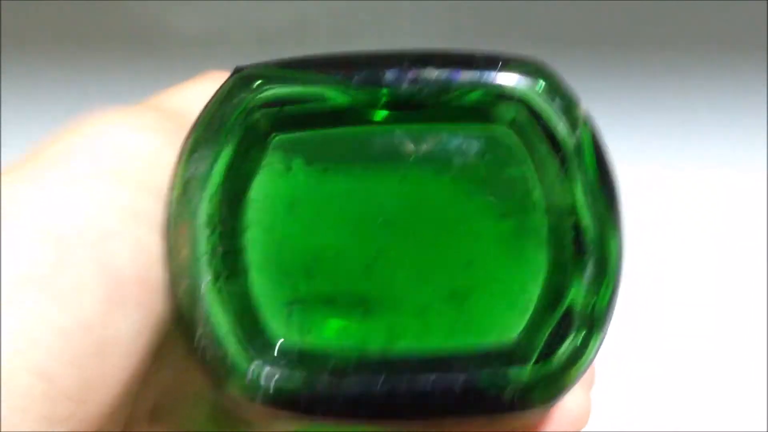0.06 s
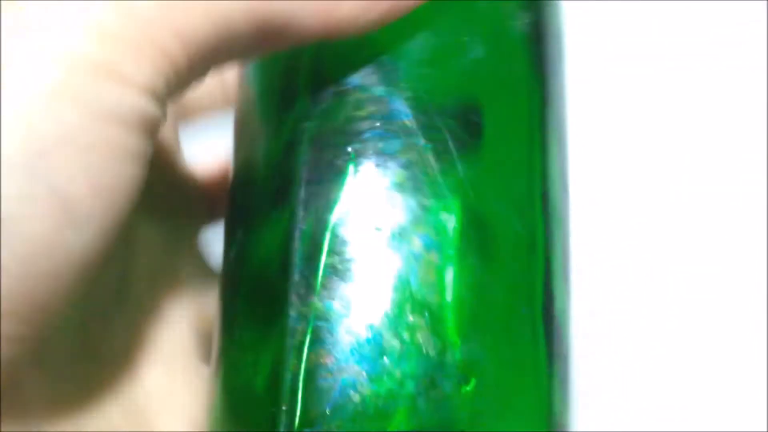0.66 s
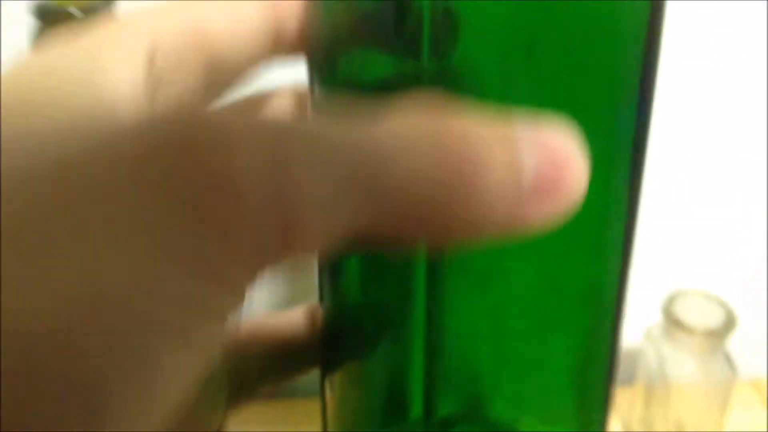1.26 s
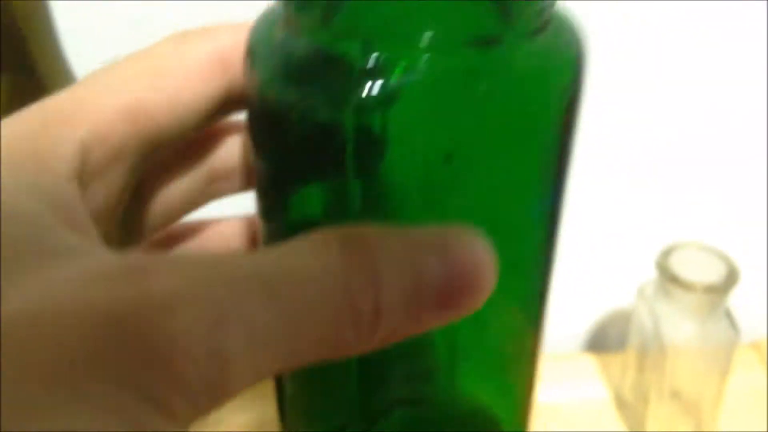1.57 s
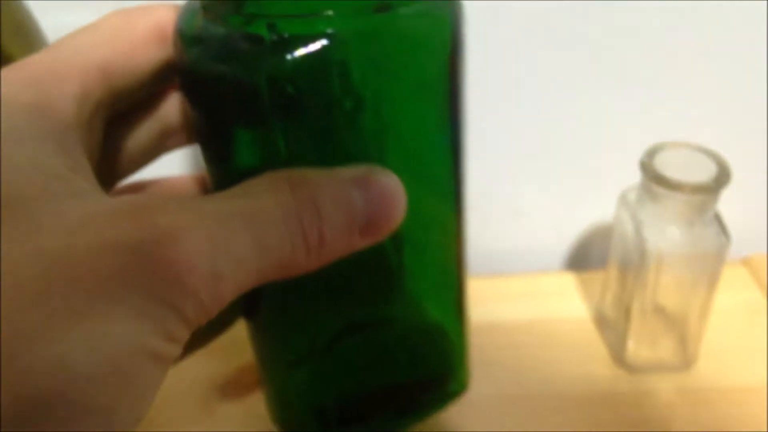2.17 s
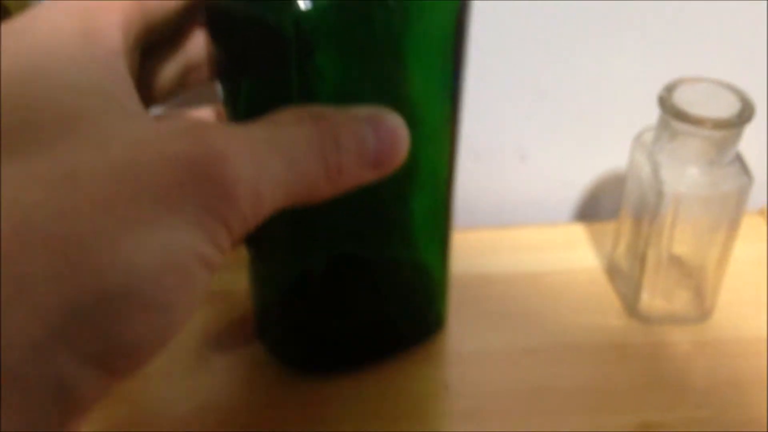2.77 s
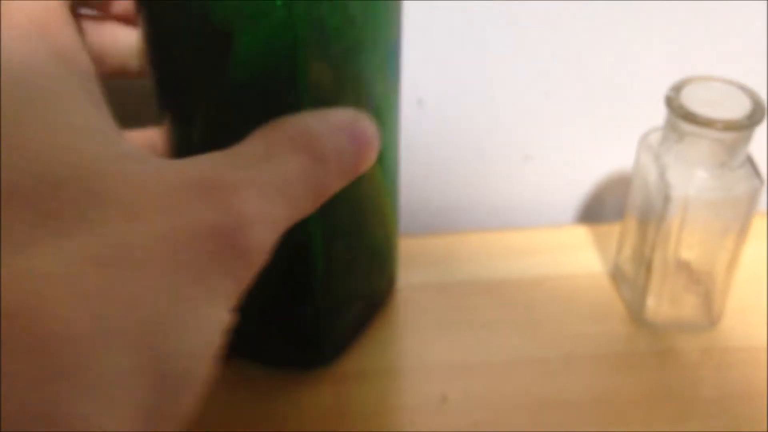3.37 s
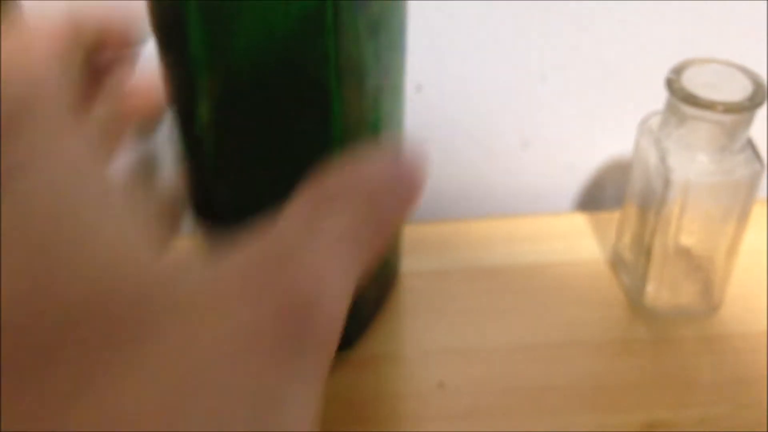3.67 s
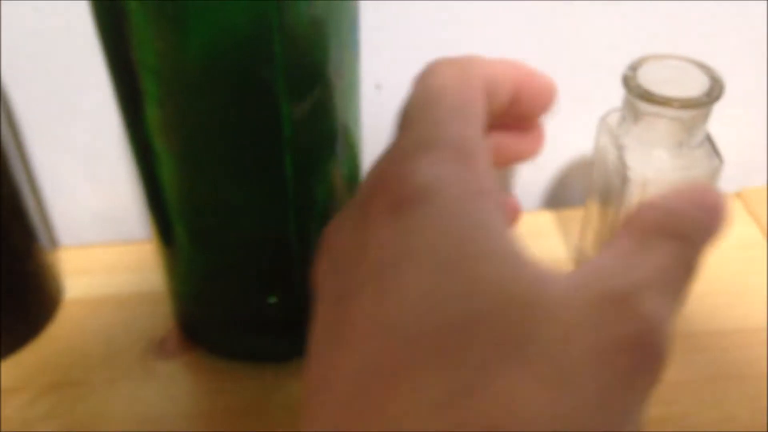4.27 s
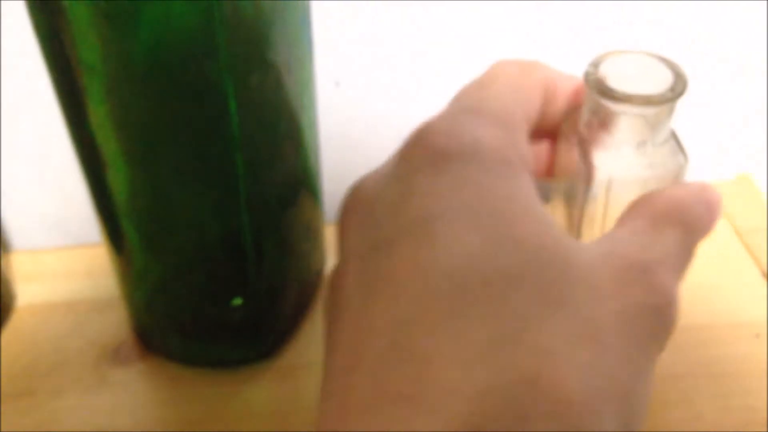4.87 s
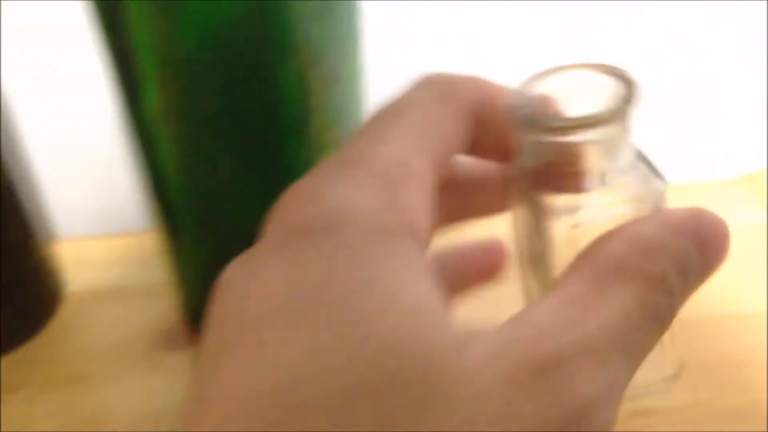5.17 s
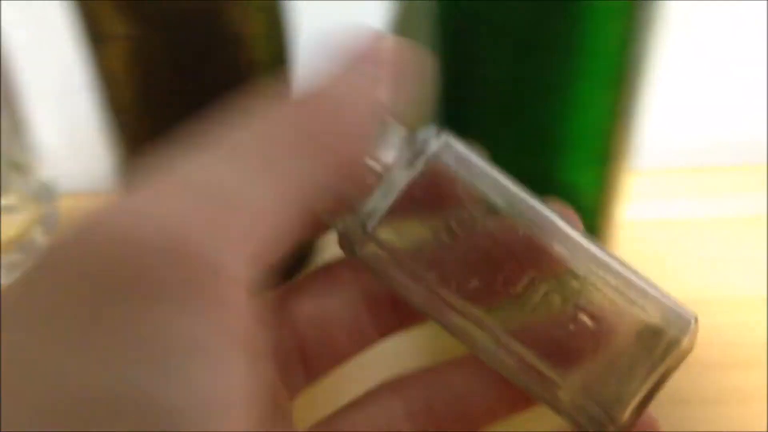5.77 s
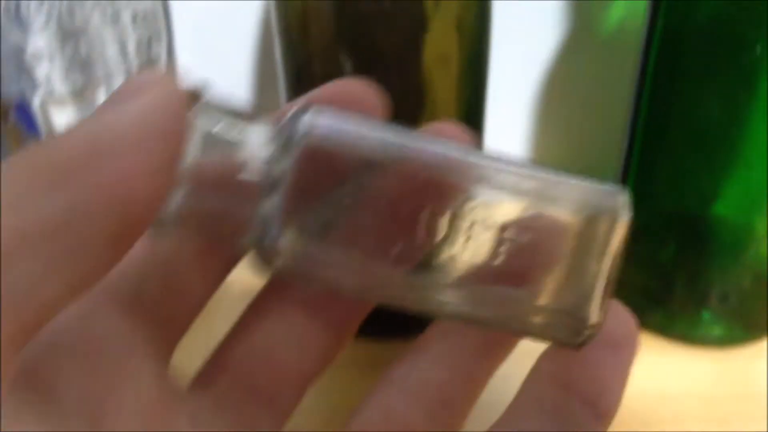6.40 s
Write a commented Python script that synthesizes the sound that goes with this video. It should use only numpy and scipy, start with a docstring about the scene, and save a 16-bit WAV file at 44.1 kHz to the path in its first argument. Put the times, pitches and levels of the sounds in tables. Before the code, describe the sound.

Soft skin rubbing on glass, then a heavy bottle's low knocks and scrapes on wood, and a smaller bottle's light scuff.

```python
"""Glass bottles on a wooden shelf

One microphone beside the shelf, in a small, quiet room with a little mains hum. A hand rubs a large
bottle, stands it on the shelf and shoves it into place, then lifts a small bottle off. Skin hisses
on the glass and makes it ring faintly; the board answers every knock with low modes."""
import sys
import numpy as np
from scipy import signal
from scipy.fft import rfft, irfft
from scipy.io import wavfile
from scipy.ndimage import uniform_filter1d

SR = 44100
rng = np.random.default_rng(int(sys.argv[2]) if len(sys.argv) > 2 else 0)


def transcribe(signal):
    """Save signal, clipped to [-1, 1], as a 16-bit WAV file at the path in sys.argv[1]."""
    frames = np.atleast_2d(signal).T
    limited = np.clip(frames, -1, 1)
    pcm = np.round(limited * 32767).astype(np.int16)
    wavfile.write(sys.argv[1], SR, pcm)


N = 292824
T = np.arange(N) / SR


def amp(db):
    """Decibels to gain."""
    return 10 ** (np.asarray(db) / 20)


def unit(x):
    """Scales to rms 1."""
    return x / np.sqrt(np.mean(x ** 2) + 1e-20)


def read(points, hz):
    """Reads a (frequency [Hz], value) table on a log-frequency axis."""
    f, value = np.transpose(points)
    return np.interp(np.log(hz + 1), np.log(f), value)


def add(mix, s, sound):
    """Mixes a sound in at s seconds."""
    part = mix[round(s * SR):][:len(sound)]
    part += sound[:len(part)]


def colour(x, points):
    """Filters by a (frequency [Hz], gain [dB]) spectrum."""
    return irfft(rfft(x) * amp(read(points, np.fft.rfftfreq(len(x), 1 / SR))), len(x))


def ring(x, modes):
    """Sum of resonances (frequency [Hz], width [Hz], peak gain [dB])."""
    return sum(amp(db) * signal.lfilter(*signal.iirpeak(hz, hz / width, SR), x)
               for hz, width, db in modes)


def tail(t60, size):
    """Noise of energy 1 in which each band dies at its own speed."""
    hz, t, bands = signal.stft(rng.choice([-1., 1.], size), SR, nperseg=256)
    decay = amp(-60 * t / read(t60, hz)[:, None])
    out = signal.istft(bands * decay, SR, nperseg=256)[1][:size]
    return out / np.linalg.norm(out)


def friction(slips_per_s, smooth, patchy_db):
    """Tiny random slips over a smooth hiss; the contact grips and eases every few milliseconds."""
    slips = rng.standard_normal(N) * (rng.random(N) < slips_per_s / SR)
    grip = unit(uniform_filter1d(uniform_filter1d(rng.standard_normal(N), size=400), size=300))
    return unit((unit(slips) + smooth * rng.standard_normal(N)) * amp(patchy_db * grip))


def strokes(rows, lean, bluntness, column=2):
    """Gain curve of strokes peaking at one column's dB; lean over 1 swells slowly and stops fast."""
    out = np.zeros(N)
    for row in rows:
        s, half = row[:2]
        span = slice(*np.searchsorted(T, [s - 8 * half, s + 8 * half]))
        away = np.maximum((s - T[span]) / lean, (T[span] - s) * lean) / half
        out[span] += amp(row[column]) * np.exp(-away ** bluntness)
    return out


# still air and microphone hiss: (frequency [Hz], gain [dB])
AIR_TONE = [(12, -66.5), (20, -34), (41, -8), (59, -1), (85, -11), (118, -4), (144, -12.5), (413, -17.5),
            (610, -22), (2810, -30.5), (7030, -33), (8080, -33.5), (10400, -34), (12600, -31.5),
            (15300, -35)]
# mains hum and a faint electric whine: (frequency [Hz], level [dB])
HUM = [(59.3, -72.5), (119, -81.5), (1311, -92), (1531, -97.5)]


def room_tone(air_db=-67):
    """The quiet room at the microphone: air and hiss under a steady hum."""
    hum = sum(amp(db) * np.sqrt(2) * np.sin(2 * np.pi * (hz * T + rng.random())) for hz, db in HUM)
    return amp(air_db) * unit(colour(rng.standard_normal(N), AIR_TONE)) + hum


# skin snagging on the large bottle or jolted along it: (time [s], level [dB], decay [s])
TICKS = [(.174, -54, .0068), (.4995, -61, .0035), (.563, -63, .003), (.701, -50, .008), (.862, -62, .01),
         (1.6059, -62, .0072), (1.926, -63, .0034), (1.9543, -57, .004), (2.128, -55, .006),
         (2.646, -44, .012), (2.6582, -41.5, .011), (2.803, -51, .007), (2.9094, -52, .008),
         (2.959, -56, .0064), (3.784, -64, .01)]
# a fingertip on it: (first slip [s], last slip [s], first level [dB], last level [dB], decay [s])
CREAK = (2.167, 2.202, -51, -43, .001)


def snags(tick_db=-2, creak_slips=7):
    """Gain curve of skin sticking and slipping: single ticks and one short, growing creak."""
    out = np.zeros(N)
    t = T[:SR // 8]
    for s, db, decay in TICKS:
        add(out, s, amp(db + tick_db) * np.exp(-t / decay))
    first_s, last_s, first_db, last_db, decay = CREAK
    for s, db in np.linspace((first_s, first_db), (last_s, last_db), creak_slips):
        add(out, s, amp(db) * np.exp(-t / decay))
    return out


# skin sliding over the large bottle:
# (time [s], half length [s], hiss [dB], palm drag [dB], free ring of the glass [dB], neck air [dB])
RUBS = [(.345, .02, -71, -92, -81, -90), (.535, .035, -70, -90, -86, -84), (.775, .03, -61, -60, -69, -70),
        (.823, .025, -57.5, -63, -61, -60.5), (.94, .022, -66, -65, -64, -77),
        (1.03, .06, -66, -68, -66, -78), (1.17, .055, -65, -70, -68, -80), (1.305, .05, -62, -95, -68, -82),
        (1.425, .045, -63.5, -84, -73, -66.5), (1.612, .02, -82, -90, -75, -85),
        (1.8, .075, -63.5, -70, -77, -66), (2.01, .05, -74, -88, -85, -85),
        (2.192, .024, -56, -65, -66, -61.5)]
# bright skin and dull palm: (frequency [Hz], gain [dB])
SKIN_TONE = [(300, -10), (1000, -5.5), (2000, -3), (3200, -2.5), (5500, -3), (7000, -1), (9000, -1.5),
             (12500, 0.5), (15000, -1)]
PALM_TONE = [(100, 2.5), (300, 2), (700, 5), (1100, 1), (1500, 1.5), (2000, 4.5), (2700, -9.5), (6000, -15)]
# the bottles' resonances, all of the large bottle but the last SHOULDER row, a ring of the small one:
# (frequency [Hz], width [Hz], gain [dB])
SIDE_WALL = [(5184, 45, 0.5), (9706, 52, -8.5), (13790, 60, -11)]
SHOULDER = [(5426, 20, 4), (7693, 30, -6), (8060, 40, -2), (11106, 36, -4), (11490, 19, 0), (11720, 26, -4),
            (12330, 26, -1)]
NECK_AIR = [(443, 40, 0)]


def hand_on_large_bottle(wall_db=-1, shoulder_db=9.5, free_db=10, neck_db=1.5):
    """Skin rubs and grips the bottle, stirring the glass and the air in its neck."""
    hiss_gain, palm_gain, free_gain, neck_gain = (
        strokes(RUBS, lean=1.15, bluntness=1.6, column=c) for c in (2, 3, 4, 5))
    touch = hiss_gain + strokes(SHOVES, lean=.9, bluntness=1.5, column=4) + snags()
    skin = unit(colour(friction(slips_per_s=3500, smooth=.6, patchy_db=1.5), SKIN_TONE))
    wall = amp(wall_db) * unit(ring(skin, SIDE_WALL)) * free_gain
    # every touch stirs the shoulder; the place of the fingers decides how freely the glass sings on
    shoulder = ring(skin * (amp(shoulder_db) * touch + amp(free_db) * free_gain), SHOULDER)
    drag = friction(slips_per_s=1210, smooth=.3, patchy_db=-1)
    palm = unit(colour(drag, PALM_TONE)) * palm_gain
    neck = amp(neck_db) * unit(ring(ring(drag, NECK_AIR), NECK_AIR)) * neck_gain
    return skin * touch + wall + shoulder + palm + neck


# the shelf with the bottles on it: (frequency [Hz], level [dB], t60 [s])
SHELF_MODES = [(116, -18, 0.38), (139, -14.5, 0.054), (211, -24, 0.41), (242, -19, 0.33), (318, -14, 0.14),
               (370, -6.5, 0.08), (402, -15, 0.15), (426, -10, 0.089), (456.8, -4, 0.135),
               (553, -16.5, 0.139), (592, -17, 0.075), (655, -4.5, 0.11), (715, 4, 0.045),
               (746, -8.5, 0.12), (887, -8, 0.051), (905, -6, 0.068), (962, -16, 0.097),
               (1030, -11.5, 0.15), (1120, -12, 0.2), (1278, -8.5, 0.065), (1390, -21, 0.074),
               (1469, -14, 0.13), (1615, -12, 0.1), (1900, -6.5, 0.058)]


def board(t, force_db, spot_hz, spot_db, spot_octaves=.4, top_hz=2200):
    """The shelf's modes as one spot excites them."""
    hz, db, t60 = np.transpose(SHELF_MODES)[:, :, None]
    favour_db = spot_db * np.exp(-(np.log2(hz / spot_hz) / spot_octaves) ** 2)
    # a bottle pressed down hard damps the upper modes: 750 dB/s per kHz at full force
    fall_db_per_s = 60 / t60 + 750 * amp(force_db) * hz / 1000
    modes = amp(db + favour_db - fall_db_per_s * t) * np.cos(2 * np.pi * hz * t)
    # the low-pass rounds the attack
    return signal.sosfilt(signal.butter(4, top_hz, fs=SR, output="sos"), modes.sum(axis=0))


# the board's crowded, quickly damped modes: (frequency [Hz], gain [dB]) and (frequency [Hz], t60 [s])
GRAIN_TONE = [(60, -22), (130, -20), (270, -13), (400, -5.5), (900, -3.5), (1500, -3), (2400, -2),
              (3300, -6), (5000, -8.5), (12000, -0.5)]
GRAIN_T60 = [(100, .12), (500, .08), (2000, .07), (10000, 0.037)]
# the thick glass base clacking on wood: (frequency [Hz], width [Hz], gain [dB])
CLACK = [(3330, 250, -9.5), (3950, 270, -18), (5413, 900, -21)]


def contact(force_db, hard_hz, spot_hz, spot_db, grain_db=12):
    """A short push rings the board; harder contacts are shorter and brighter."""
    t = T[:SR // 2]
    burst = tail(GRAIN_T60, size=len(t))
    grain = colour(burst, GRAIN_TONE) * (t < t[-1] / 2)
    wood = board(t, force_db, spot_hz, spot_db) + amp(grain_db) * grain
    push_time = 2 * np.pi * hard_hz * t[:SR // 50]
    push = push_time * np.exp(-push_time)
    thud = amp(force_db) * signal.fftconvolve(wood, push / push.sum())[:len(t)]
    # the clack stands out only on heavy blows
    return thud + amp(force_db) ** 1.4 * ring(burst, CLACK)


# glass meeting the shelf: (time [s], force [dB], hardness [Hz], band the spot favours [Hz], its boost [dB],
# delay of the second edge [s])
KNOCKS = [(2.6222, -50, 824, 600, 2, .011), (2.646, -7, 790, 353, 9.5, .0128),
          (2.6513, -10.5, 650, 942, 9, .0253), (2.8986, -20, 470, 474, 5, .0118),
          (2.917, -32.5, 650, 420, 0, .008), (3.0993, -45, 850, 890, 1, .02),
          (3.1165, -35, 260, 330, 17.5, .0195), (3.3156, -25, 300, 455, 1, .009),
          (3.3315, -8.5, 550, 487, 6, .0133), (3.3555, -11.5, 420, 540, 5.5, .0219),
          (3.562, -49, 520, 900, 4, .008), (3.6147, -44, 480, 510, 16.5, .0143),
          (3.654, -41, 750, 900, 3.5, .009), (3.688, -30, 124.7, 116.6, 15, .009),
          (3.762, -48, 400, 345, 6.5, .015), (3.893, -54, 330, 250, 11, .015),
          (4.011, -55, 360, 230, 9, .014), (4.95, -48, 1240, 600, 12, .004),
          (4.958, -42, 1300, 810, 9, .0105), (4.9647, -37, 1200, 690, 8, .0152),
          (5.0139, -60, 1210, 620, 9, .006), (5.0263, -58.5, 1100, 703, 7, .007)]


def knocks(second_edge_db=-8.5, second_edge_hz=1500, null_hz=250, null_width_hz=100, radiate_hz=105):
    """A base lands on the shelf on one edge; the other edge follows a moment later, weaker and duller."""
    out = np.zeros(N)
    dull = signal.butter(1, second_edge_hz, fs=SR)
    for s, force_db, hard_hz, spot_hz, spot_db, second_edge_s in KNOCKS:
        blow = contact(force_db, hard_hz, spot_hz, spot_db)
        add(out, s, blow)
        add(out, s + second_edge_s, amp(second_edge_db) * signal.lfilter(*dull, blow))
    # an anti-resonance parts the low thud from the hollow clunk
    out = signal.lfilter(*signal.iirnotch(null_hz, null_hz / null_width_hz, SR), out)
    # all-pass: bending waves near 950 Hz arrive late, spreading the first spike of a blow
    out = out - 2 * ring(out, [(950, 540, 0)])
    # a narrow board radiates little deep bass
    return signal.sosfilt(signal.butter(2, radiate_hz, "high", fs=SR, output="sos"), out)


# the large bottle pushed into place: (time [s], half length [s], scrape [dB], shudder [dB], grip [dB])
SHOVES = [(2.77, .06, -57.5, -39.5, -69), (2.885, .05, -57, -48, -68), (2.98, .042, -51.5, -44, -70),
          (3.11, .06, -80, -47, -71), (3.285, .035, -53, -52, -64), (3.365, .06, -44, -35, -59),
          (3.5, .05, -57, -46, -65), (3.6, .05, -62, -39, -73), (3.7, .04, -67, -43, -72)]
# its base rasping on wood: (frequency [Hz], gain [dB])
SCRAPE_TONE = [(150, -15.5), (300, -0.5), (450, 1), (800, 7.5), (1200, 4), (1900, -0.5), (2400, -14),
               (3400, -16), (4300, -22), (6000, -29)]
# the board's low shudder: (frequency [Hz], width [Hz], gain [dB])
SHUDDER = [(119.57, 25, 0), (144.9, 23.3, -2.5), (190.2, 23, -7), (220.2, 24, -3)]


def shoves(wood_slips, chatter_db=-29.5):
    """The heavy base drags over the wood, rasping and making the board shudder."""
    drag = strokes(SHOVES, lean=1.05, bluntness=1.7)
    scrape = unit(colour(wood_slips, SCRAPE_TONE)) * drag
    judder = friction(slips_per_s=330, smooth=.35, patchy_db=2.5)
    shake = strokes(SHOVES, lean=.8, bluntness=1.8, column=3)
    shudder = unit(ring(ring(judder, SHUDDER), SHUDDER)) * shake
    # the glass base chatters mostly on the hardest shove
    chatter = amp(chatter_db) * ring(wood_slips * (drag / drag.max()) ** 2, CLACK)
    return scrape + shudder + chatter


# the hand opening to reach for the small bottle: (time [s], half length [s], hiss [dB])
REACH = [(4.466, .024, -61)]


def finger_brush(palm_db=-6):
    """Fingers brush one another: dry skin, with no glass to ring."""
    slips = friction(slips_per_s=2000, smooth=.97, patchy_db=1.5)
    skin = unit(colour(slips, SKIN_TONE)) + amp(palm_db) * unit(colour(slips, PALM_TONE))
    return skin * strokes(REACH, lean=.85, bluntness=2.4)


# fingers shifting on the small bottle: (time [s], half length [s], hiss [dB])
FINGER_SLIPS = [(4.955, .025, -70), (5.265, .04, -74), (5.335, .015, -75), (5.422, .012, -65),
                (5.662, .01, -70), (5.94, .04, -79), (6.105, .01, -75), (6.195, .018, -70),
                (6.287, .014, -65), (6.41, .012, -73), (6.56, .03, -75)]
# the ring of its glass: (frequency [Hz], width [Hz], gain [dB])
SMALL_GLASS = [(7885, 42, 23), (12350, 60, 22), (13200, 80, 16), (13900, 70, 14)]


def hand_on_small_bottle(gain_db=-5):
    """Brief slips of skin hiss and ring the small bottle's high modes."""
    skin = unit(colour(friction(slips_per_s=3500, smooth=.6, patchy_db=1.5), SKIN_TONE))
    hiss = amp(gain_db) * skin * strokes(FINGER_SLIPS, lean=.8, bluntness=1.6)
    return hiss + ring(hiss, SMALL_GLASS)


# the small base on the wood: (time [s], half length [s], level [dB]) and (frequency [Hz], gain [dB])
SCUFFS = [(4.961, .022, -47.5), (5.027, .013, -57)]
SCUFF_TONE = [(100, -12), (215, 5), (350, -3), (700, 5.5), (1300, -2.5), (2100, -6.5), (2800, -18),
              (3400, -18), (3900, -13), (4600, -23.5), (9000, -28.5)]


def scuffs(wood_slips):
    """The small bottle scuffs the shelf as it tips up."""
    return unit(colour(wood_slips, SCUFF_TONE)) * strokes(SCUFFS, lean=1.05, bluntness=2.8)


# the small room's decay: (frequency [Hz], t60 [s])
ROOM_T60 = [(100, 0.811), (250, .55), (700, 0.35), (2000, 0.17), (10000, 0.067)]


def room(x, wet_db=-26):
    """This close to the shelf, the walls add only a faint, short tail."""
    return x + amp(wet_db) * signal.fftconvolve(x, tail(ROOM_T60, size=SR))[:N]


def scene():
    """Everything as heard from beside the shelf, in mono."""
    shelf = knocks()
    wood_slips = friction(slips_per_s=900, smooth=.99, patchy_db=-2.5)
    shelf += shoves(wood_slips) + scuffs(wood_slips)
    hand = hand_on_large_bottle() + finger_brush() + hand_on_small_bottle()
    return (room(shelf + hand) + room_tone())[None]


def record(dry, edge_hz=15450):
    """The microphone rounds the highest peaks; a steep low-pass cuts the top treble."""
    rounded = dry / (1 + dry ** 6) ** (1 / 6)
    low_pass = signal.firwin(511, edge_hz, window=("kaiser", 9), fs=SR)
    return signal.oaconvolve(rounded, low_pass[None], "same")


dry = scene()
out = record(dry)
transcribe(out)
```